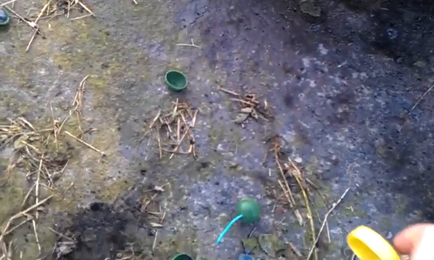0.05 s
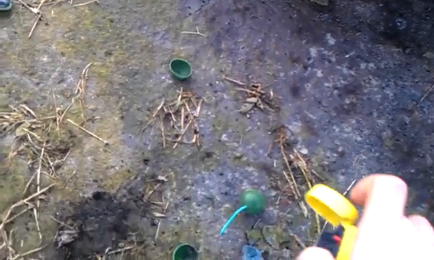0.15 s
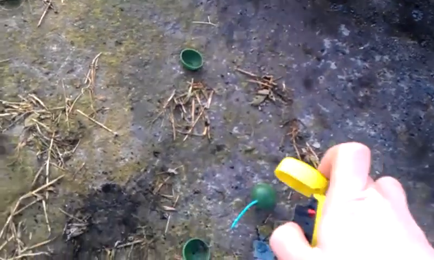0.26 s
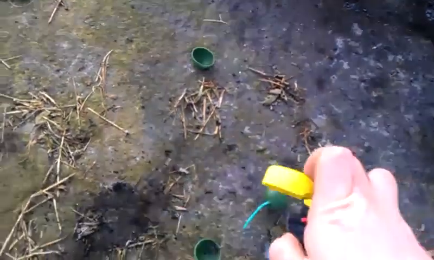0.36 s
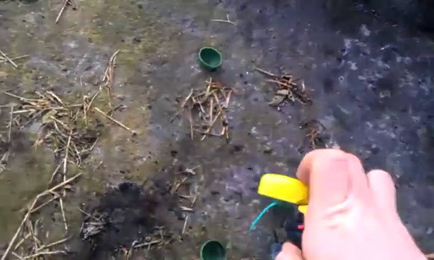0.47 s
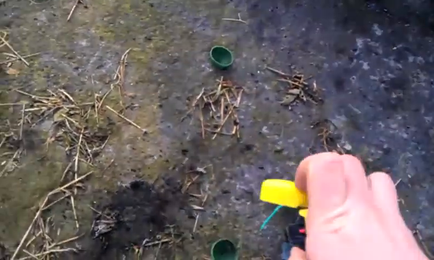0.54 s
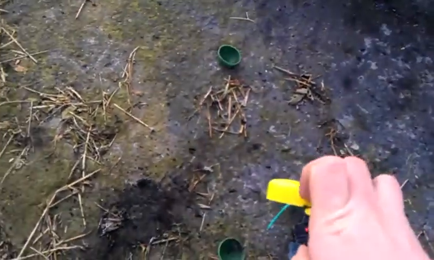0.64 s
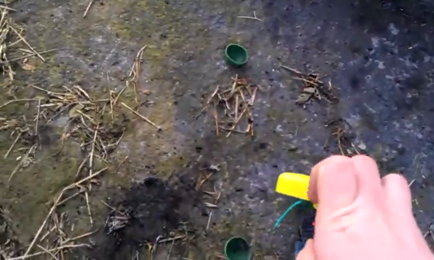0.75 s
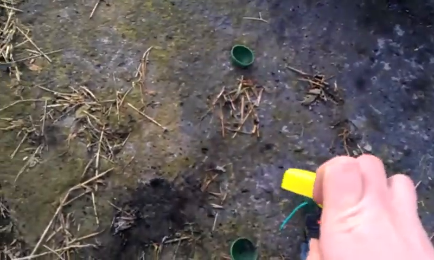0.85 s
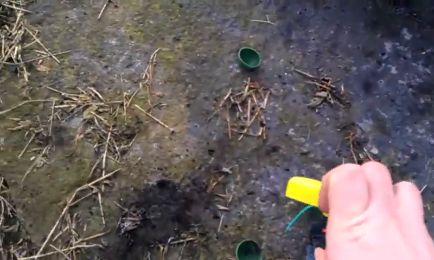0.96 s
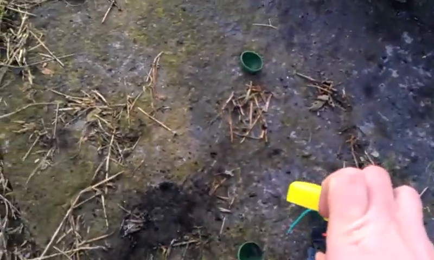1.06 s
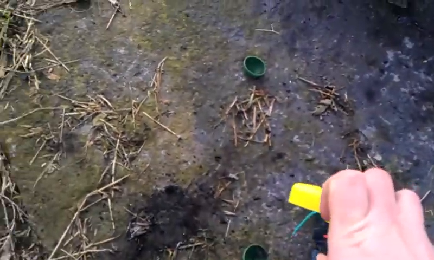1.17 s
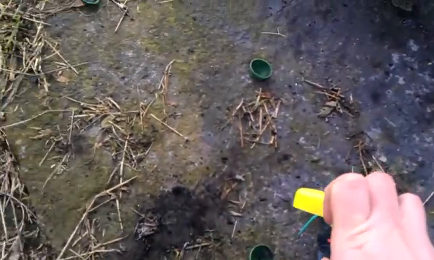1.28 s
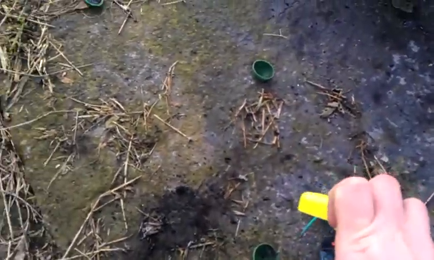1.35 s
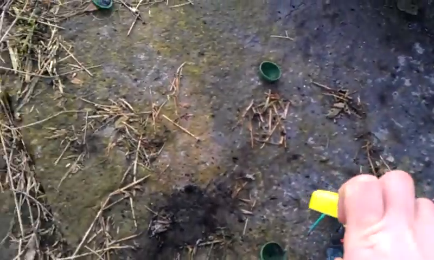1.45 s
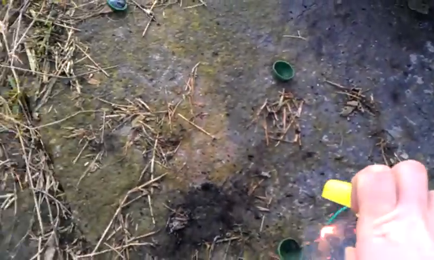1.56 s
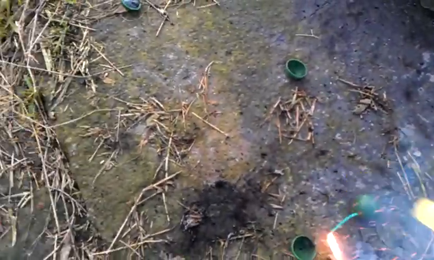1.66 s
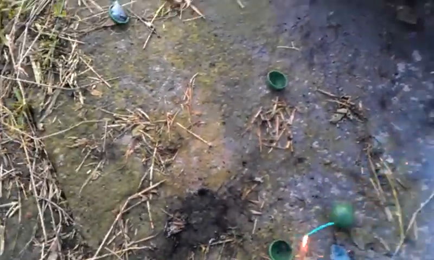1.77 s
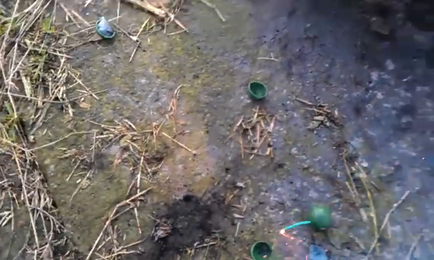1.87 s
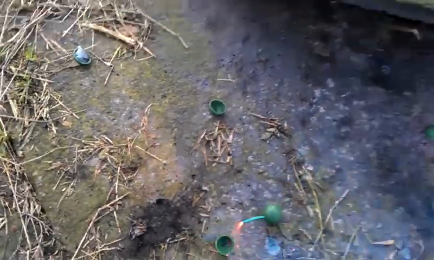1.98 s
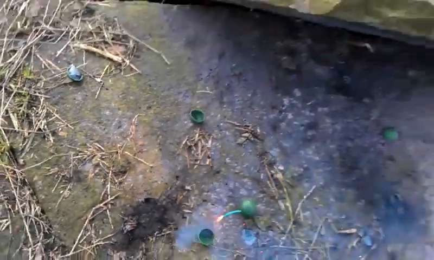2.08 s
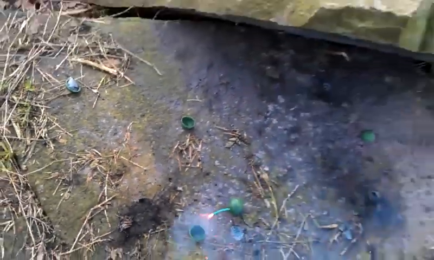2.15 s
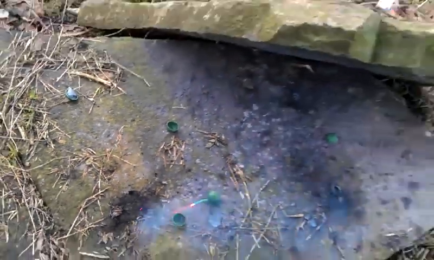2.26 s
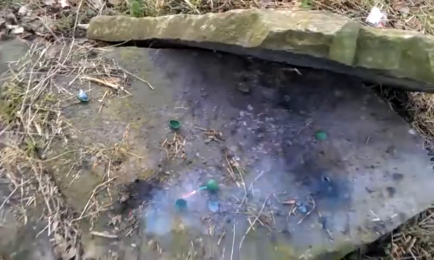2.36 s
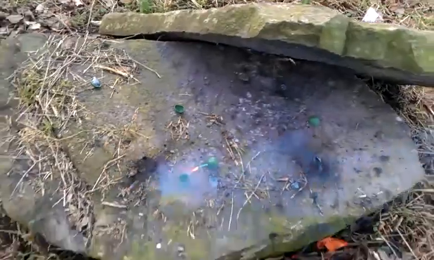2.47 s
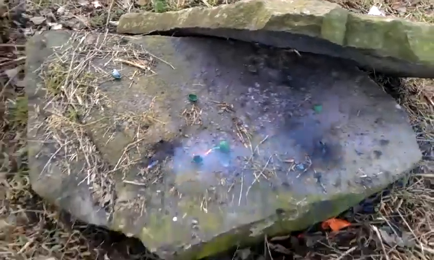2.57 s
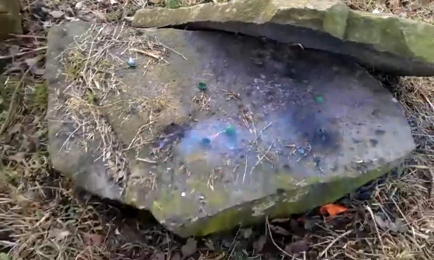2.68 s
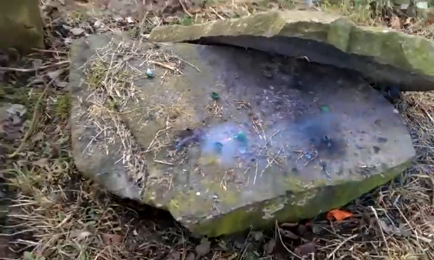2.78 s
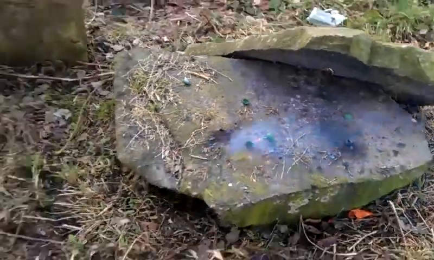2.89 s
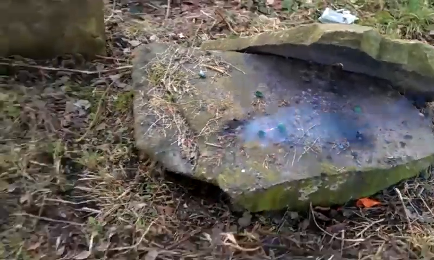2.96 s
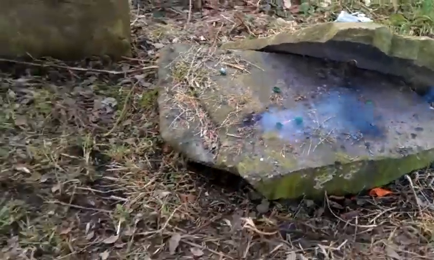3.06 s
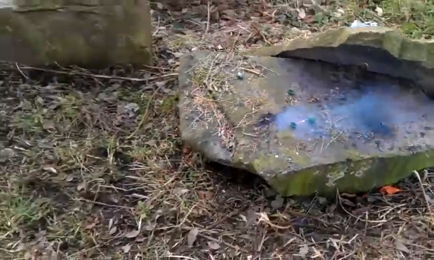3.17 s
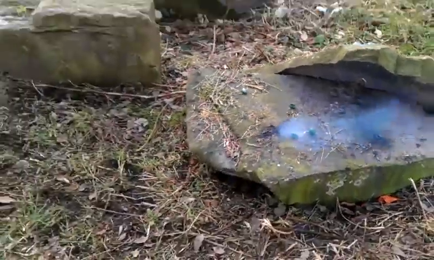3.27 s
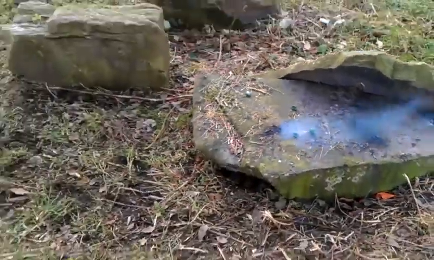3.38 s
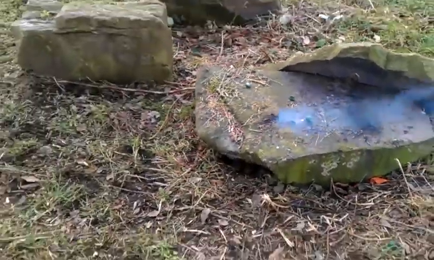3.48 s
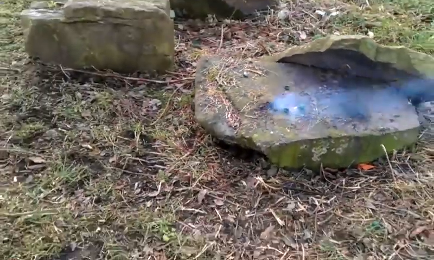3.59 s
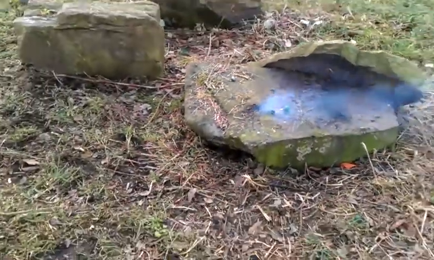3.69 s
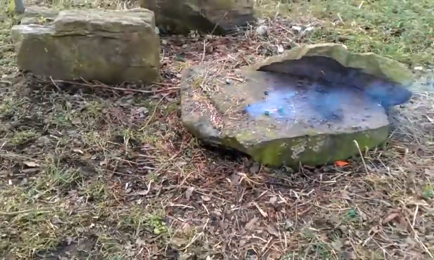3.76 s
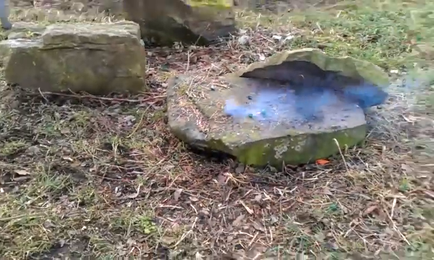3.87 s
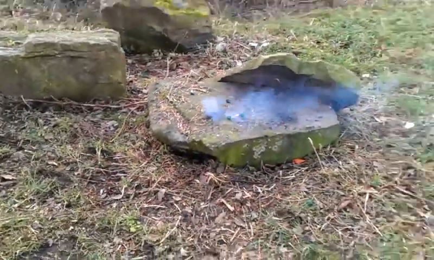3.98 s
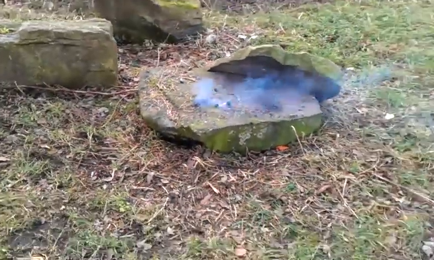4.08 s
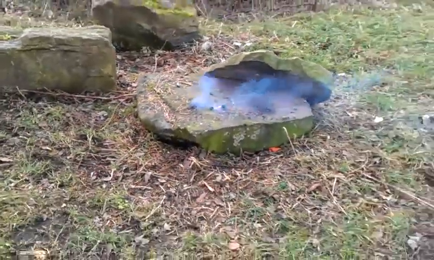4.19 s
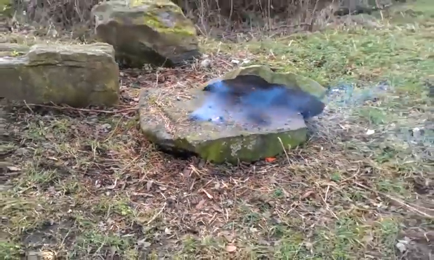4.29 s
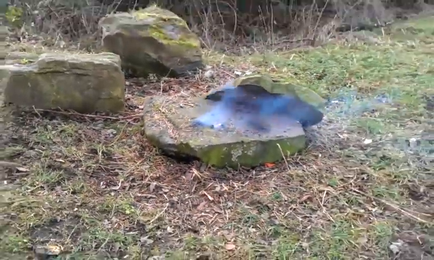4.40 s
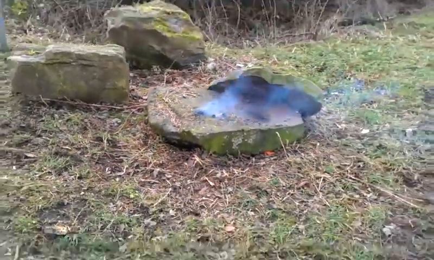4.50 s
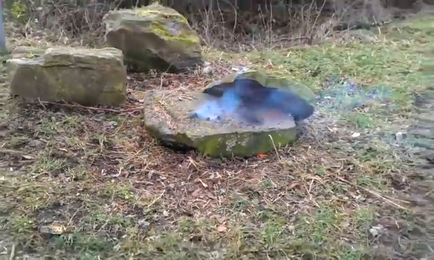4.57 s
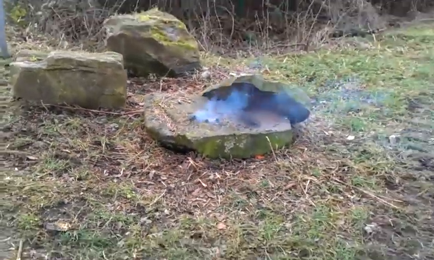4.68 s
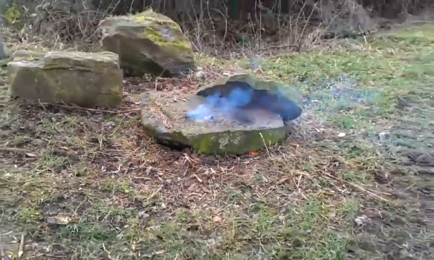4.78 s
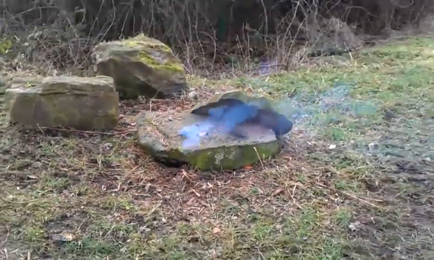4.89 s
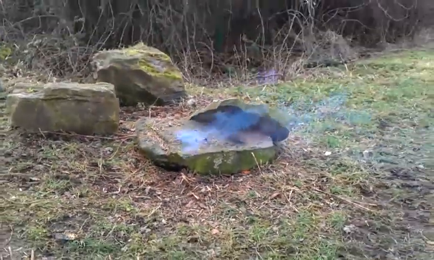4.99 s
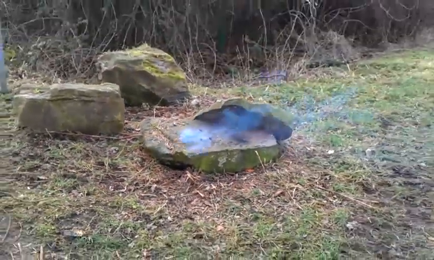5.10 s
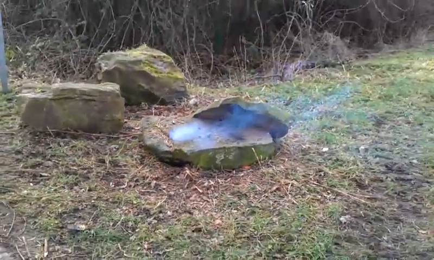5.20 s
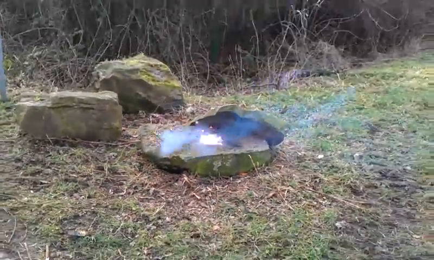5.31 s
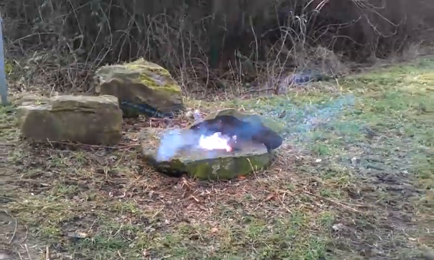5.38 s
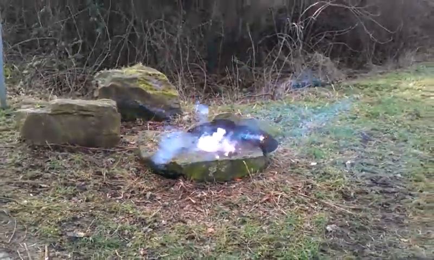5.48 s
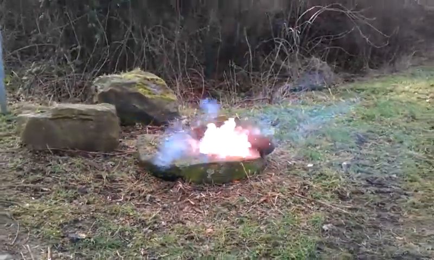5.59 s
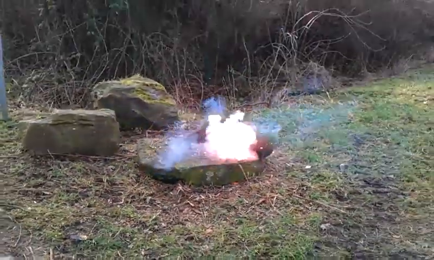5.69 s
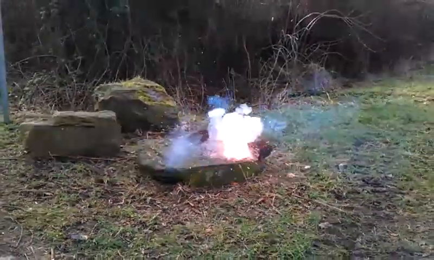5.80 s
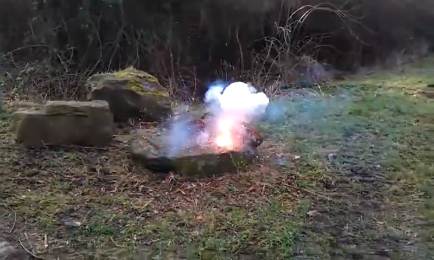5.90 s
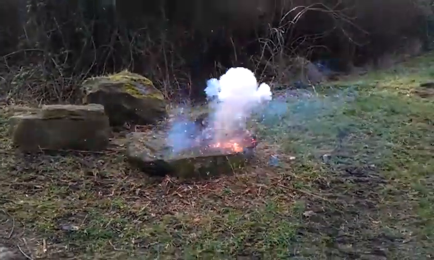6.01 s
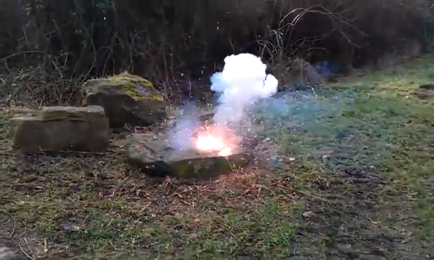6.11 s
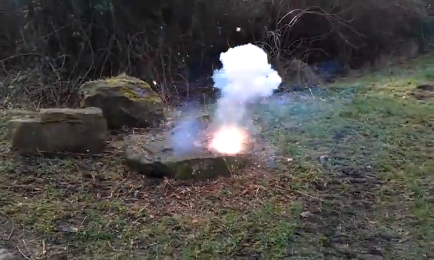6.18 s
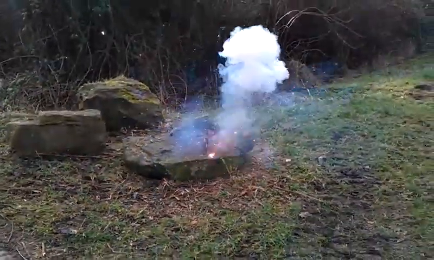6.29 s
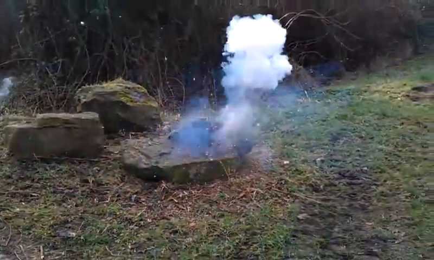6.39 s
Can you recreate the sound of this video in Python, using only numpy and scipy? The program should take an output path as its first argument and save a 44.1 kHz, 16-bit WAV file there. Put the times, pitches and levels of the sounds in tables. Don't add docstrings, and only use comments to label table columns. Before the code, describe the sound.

Outdoors in mono, a faint breeze rumbles over a quiet open-air hush. Cloth rustles lightly until about 0.4 seconds, with a soft tick and a small knock. At 0.67 gas hisses briefly, then a tight cluster of sharp plastic snaps comes at 0.76 and the flame burns with a soft, sagging hiss. Around 1.55 the fuse catches, swelling into a bright spitting jet by 1.8, with a hollow, phasey stone reflection. It recedes as the listener backs away; clicks and low bumps come near 2.5-2.9, then scattered dull footsteps. The hiss flares again at 4.9, ebbs, and puffs with a click at 5.3. Isolated hard pops strike from 5.5, thickening after 5.7 into very loud, dense, ragged crackling. The microphone overloads and its level clamps, with a brief lull near 6.28, and crackling still continues at the cut around 6.45.

```python
import sys
import numpy as np
from scipy import signal
from scipy.fft import rfft, irfft, next_fast_len
from scipy.io import wavfile
from scipy.ndimage import map_coordinates

SR = 44100
rng = np.random.default_rng(int(sys.argv[2]) if len(sys.argv) > 2 else 0)


def dump(signal):
    limited = np.clip(np.atleast_2d(signal).T, -1, 1)
    pcm = np.round(limited * 32767).astype(np.int16)
    wavfile.write(sys.argv[1], SR, pcm)


def voltage_ratio(level):
    return 10 ** (np.asarray(level, float) / 20)


N = 284445

# pitch_hz, density_db (per Hz)
WIND_COLOUR = [(12, -42), (20, -2), (54, -2), (93, -4), (201, -13.5), (233, -13), (400, -32.5), (520, -50),
               (880, -120)]
# peak_s, peak_db, slowness (1 = usual)
GUSTS = [(.1, -56, 3.1), (.7, -56, 1.5), (1, -55, 1.5), (1.24, -53, .9), (1.36, -53, 1.5), (2.28, -51, 1.6),
         (2.45, -53, .9), (2.675, -38, .45), (2.75, -45, .4), (2.86, -51, .9), (2.98, -47, 1.6),
         (3.2, -52, 1.5), (3.33, -42, .4), (3.41, -50, .9), (3.6, -54, .9), (4, -52, 2.2), (4.33, -49, .9),
         (4.6, -54, 1.2), (4.83, -49, 1.1), (5.04, -49, 1.2), (5.18, -48, 1.1), (5.36, -48, .9),
         (5.57, -51, .9)]
BREEZE_DB, GUST_RISE_S, GUST_FALL_S = -59, .05, .08
BLAST_WIND_S, BLAST_WIND_DB = 5.7, -49
# pitch_hz, density_db (per Hz)
FIELD_COLOUR = [(100, 1.5), (250, -3), (600, -5), (1200, -4), (1900, -11), (3000, -18), (7000, -16),
                (15500, -24)]
FIELD_DB = -54

# pitch_hz, density_db (per Hz)
GAS_COLOUR = [(1760, -57), (3000, -27), (4090, -10), (4790, -20), (5720, -8), (7530, 2), (15500, -20)]
RUSTLE_DB, RUSTLE_FADE_DB_PER_S, RUSTLE_END_S = -58, 30, .36
# peak_s, peak_db, rise_s (per 10 dB), fall_s (per 10 dB)
BRUSH = [
    (.11, -49, .016, .012),
]
VALVE_S, GAS_END_S, GAS_DB = .67, .745, -52
# peak_s, peak_db, rise_s (per 10 dB), fall_s (per 10 dB)
CATCH = [
    (.82, -50, .05, .035),
]
# pitch_hz, density_db (per Hz)
FLAME_COLOUR = [(290, -37), (500, -7), (839, 0), (1070, -10), (1510, -1), (1770, -19), (2040, -2),
                (2540, -16), (3680, -9), (4130, -29), (5050, -12), (6360, -12), (8120, -22.5), (15500, -21)]
FLAME_S, FLAME_END_S, FLAME_DB, FLAME_SAG_DB_PER_S = .785, 1.54, -49, 5
# delay_ms, share
FLAME_ECHOES = [(1.39, 0.067), (1.62, 0.12), (2.08, .15)]
# pitch_hz, level_db, t60_s
SHELL_MODES = [(2150, -4, 0.028), (2360, -8, 0.014), (4020, -10, .014), (5580, -3, 0.021), (6800, -3, 0.01),
               (8800, 2.5, .010), (11900, -17, .010), (14700, -18, .010)]
# start_s, peak_db, crack_db (relative to peak)
CLICKS = [(.108, -52, 6), (.7573, -9, -5), (.7585, -10, -5), (.7598, -12, -5), (.7615, -19, 0),
          (.7695, -31, 3), (.815, -46, 9), (.822, -47, 9), (.83, -48, 9), (1.255, -52, 6), (1.7805, -22, 8),
          (5.308, -28, 8), (2.6534, -19, 13), (2.6559, -20, 11), (2.6599, -22, 11)]
# start_s, peak_db, pitch_hz
STEPS = [(0.361, -36, 2120), (.7575, -37, 400), (.7575, -34, 890), (2.529, -34, 385), (2.54, -35, 800),
         (2.666, -31, 146), (2.683, -31, 107), (2.729, -36, 76), (2.836, -37, 590), (3.826, -33.5, 480),
         (4.34, -35, 222), (4.345, -36, 550), (4.61, -39, 101), (4.761, -34, 90), (4.81, -43, 110),
         (5.174, -40, 80)]

# time_s, jet_db
FUSE = [(1.535, -62), (1.547, -45), (1.581, -38), (1.8, -21), (1.87, -26), (2.22, -31.5), (2.85, -36),
        (3.22, -34), (3.6, -41), (4.55, -42), (4.76, -41), (4.8, -34), (4.88, -29), (5.07, -31.5),
        (5.14, -36), (5.35, -42), (5.4, -38), (5.9, -38)]
MEAN_JET_DB = -35
# pitch_hz, density_db (per Hz)
JET_COLOUR = [(1470, -33), (2500, -20), (3110, -14.5), (3650, -9), (5670, -1), (7080, 2.5), (7820, 2),
              (11000, -13.5), (14300, -43), (22000, -120)]
# pitch_hz, density_db (per Hz)
AIR_COLOUR = [(9000, -2), (11000, -2), (15500, -3), (17000, -1)]
# pitch_hz, density_db (per Hz)
ROAR_COLOUR = [(700, -6), (1100, -5), (2000, -2), (3000, 0), (4500, -9.5)]
# pitch_hz, density_db (per Hz)
WHOOSH_COLOUR = [(120, -20), (300, 3), (450, -3.5), (800, 5.5), (1300, -13)]
# peak_s, peak_db, rise_s (per 10 dB), fall_s (per 10 dB), roar_db (relative to peak)
PUFFS = [(2.39, -30, .1, .05, -11), (2.53, -36, .05, .07, -10), (2.7, -33, .06, .07, -11),
         (3.5, -42, .1, .05, -4), (3.8, -40.5, .15, .09, -8), (4.05, -38, .1, .04, -10),
         (4.15, -41, .05, .03, -12), (4.35, -43, .1, .07, -5), (5.3, -22.5, .028, .04, -19),
         (5.333, -22.5, .055, .008, -22), (5.338, -34, .002, .006, 17), (5.37, -45, .03, .06, 8),
         (5.54, -27.5, .05, .032, -10), (5.63, -30.5, .04, .06, -12), (5.76, -15, .045, .17, -14)]
GUSH_WHOOSH_DB, GUSH_ROAR_DB, GUSH_AIR_DB = -7.5, -6, -18
IGNITION_END_S, IGNITION_FADE_S, ROAR_BUILD_S, ROAR_LINGER_S = 1.78, .03, .15, .08
WHOOSH_DB, WHOOSH_FOLLOWS, WHOOSH_LOSS_DB_PER_S = -52, .55, 1.5
ROAR_DB, ROAR_FOLLOWS, ROAR_LOSS_DB_PER_S = -43, .58, 1.8
AIR_DB, AIR_LOSS_DB_PER_S, BURST_S, BURST_AIR_DB, BURST_ROAR_DB = -3, 4.5, 5.345, 9.5, 3.5
# time_s, delay_ms, share
SLAB_ECHO = [(1.5, 1.64, .3), (1.7, 1.65, .35), (1.95, 1.54, .55), (2.2, 1.52, .58), (2.57, 1.61, .5),
             (2.7, 1.65, .22), (2.95, 1.69, .28), (3.1, 1.84, .27), (3.6, 1.91, .42), (4.45, 1.95, .25),
             (4.55, 1.68, .3), (4.85, 1.61, .58), (5.2, 1.72, .58), (5.4, 1.69, .3)]
# time_s, delay_ms, share
NEAR_ECHO = [(1.5, .58, .25), (2.4, .76, .2), (2.9, .69, .3), (3.2, .7, .42), (3.75, .85, .25),
             (4.1, .78, .05), (5.4, .7, .14)]

# start_s, strength_db (over the overload point), low_part_db
POPS = [(5.3355, -10, 27), (5.4943, 12, 6), (5.5942, 10, 3), (5.6085, -10, 0), (5.611, -14, 0),
        (5.683, -3, 4), (5.691, 4, 0), (5.7075, -3, 0), (5.7269, 10, 0), (5.7328, 8, 0), (5.8022, 10, 0),
        (5.8105, 8, 0), (5.8255, 10, 0), (5.8825, 8, 4), (5.9074, 8, 0), (6.0781, 10, 0), (6.2015, 10, 2),
        (6.2675, 10, 2), (6.2838, 14, 2), (6.2985, 10, 0), (6.318, 12, 0), (6.393, 10, 0)]
# time_s, rate_per_s, strength_db (typical)
CRACKLE = [
    (5.69, 90, -21),
    (5.73, 200, -20),
    (5.77, 850, -12),
    (6.24, 980, -11),
    (6.28, 750, -14.5),
    (6.32, 900, -12),
    (6.45, 950, -11),
]
# start_s, size_db, direction
KICKS = [(5.7833, -24.5, -1), (5.839, -18.5, -1), (5.8868, -20.5, 1), (5.9305, -27, -1), (6.0082, -25, -1),
         (6.0385, -25, -1), (6.0918, -25.5, 1), (6.1486, -24.5, -1), (6.1685, -24, -1), (6.1798, -24.5, 1),
         (6.286, -25, -1), (6.3069, -21.5, -1), (6.3702, -20, 1)]
OVERLOAD = .44
CLAMP_DB, CLAMP_SLOPE = -21.5, 0.66


def clock():
    return np.arange(N) / SR


def unit(x):
    return x / np.sqrt(np.mean(x ** 2) + 1e-20)


def in_time(rows, off=None):
    s, *columns = np.transpose(rows)
    return [np.interp(clock(), s, column, off, off) for column in columns]


def after(s, fade_s):
    return .5 + .5 * np.tanh((clock() - s) / fade_s)


def swells(s, peak_db, rise_s, fall_s):
    coarse = clock()[::32]
    t = coarse[:, None] - s
    gain = voltage_ratio(peak_db + 10 * np.minimum(t / rise_s, -t / fall_s))
    return np.interp(clock(), coarse, np.sqrt(np.sum(gain ** 2, axis=1)))


def one_pole(x, seconds):
    r = np.exp(-1 / (seconds * SR))
    return signal.lfilter([1 - r], [1, -r], x + 1e-18)


def filtered(x, order, hz, kind):
    return signal.sosfilt(signal.butter(order, hz, kind, fs=SR, output="sos"), x)


def drift(rate_hz, db):
    smooth = signal.butter(2, rate_hz, fs=SR / 40, output="sos")
    slow = signal.sosfilt(smooth, rng.standard_normal(N // 40 + 2002))[2000:]
    return db * unit(slow)


def full_rate(slow):
    return np.interp(np.arange(N) / 40, np.arange(len(slow)), slow)


def hiss(colour, patchy_db, grainy_db, rate_hz=15):
    size = next_fast_len(N)
    hz = np.arange(size // 2 + 1) * SR / size + 1
    pitch_hz, density_db = np.transpose(colour)
    grain = unit(one_pole(rng.standard_normal(N), 0.00073))
    white = rng.standard_normal(N) * voltage_ratio(grainy_db * grain)
    lines = rfft(white, size) * voltage_ratio(np.interp(np.log(hz), np.log(pitch_hz), density_db, -70))
    together = drift(rate_hz, 0.95 * patchy_db)
    out = 0
    for octave in range(5, 15, 2):
        window = np.cos(np.clip((np.log2(hz) - octave) / 2, -1, 1) * np.pi / 2) ** 2
        flicker = full_rate(voltage_ratio(together + drift(rate_hz, patchy_db)))
        out = out + irfft(lines * window, size)[:N] * flicker
    return unit(out)


def strikes(rows, db):
    x = np.zeros(N)
    x[[round(row[0] * SR) for row in rows]] = voltage_ratio(db)
    return x


def ring(x, hz, t60):
    r, w = voltage_ratio(-60 / (t60 * SR)), 2 * np.pi * hz / SR
    return signal.lfilter([0, np.sin(w)], [1, -2 * r * np.cos(w), r * r], x + 1e-18)


def ring_down(clicks, seconds, tail_db, tail_s):
    fall = one_pole(clicks, seconds) * seconds * SR
    tail = one_pole(clicks, tail_s) * tail_s * SR
    return fall + voltage_ratio(tail_db) * tail


def capsule(x, low_db):
    peak = ring(x, hz=7230, t60=0.00135) * 0.41
    return peak + voltage_ratio(low_db) * filtered(x, 2, [500, 14000], "band")


def wind():
    s, peak_db, slow = np.transpose(GUSTS)
    level = np.hypot(voltage_ratio(BREEZE_DB), swells(s, peak_db, slow * GUST_RISE_S, slow * GUST_FALL_S))
    level = level + voltage_ratio(BLAST_WIND_DB) * after(BLAST_WIND_S, .01)
    return level * hiss(WIND_COLOUR, patchy_db=2.2, grainy_db=0, rate_hz=8.6)


def field():
    return voltage_ratio(FIELD_DB) * hiss(FIELD_COLOUR, patchy_db=.5, grainy_db=0)


def rustle_and_gas():
    t = clock()
    rustle = voltage_ratio(RUSTLE_DB - RUSTLE_FADE_DB_PER_S * t) * (1 - after(RUSTLE_END_S, .02))
    rustle = np.hypot(rustle, swells(*np.transpose(BRUSH)))
    valve = voltage_ratio(GAS_DB) * after(VALVE_S, .003) * (t < GAS_END_S)
    catch = swells(*np.transpose(CATCH))
    return (rustle + valve + catch) * hiss(GAS_COLOUR, patchy_db=.7, grainy_db=.8)


def lighter_clicks():
    s, peak_db, crack_db = np.transpose(CLICKS)
    spread_db = rng.normal(0, 1.5, (len(s), len(SHELL_MODES)))
    body = 0
    for k, (hz, db, t60) in enumerate(SHELL_MODES):
        body = body + ring(strikes(CLICKS, peak_db + db - 5 + spread_db[:, k]), hz, 0.78 * t60)
    burst = ring_down(strikes(CLICKS, peak_db + crack_db - 3), .0015, tail_db=-22, tail_s=.009)
    snap = strikes(CLICKS, peak_db + crack_db - 16.5)
    crack = capsule(burst * rng.standard_normal(N) + snap, low_db=-3.5)
    return filtered(body + crack, 4, 1800, "high")


def flame():
    t = clock()
    direct = hiss(FLAME_COLOUR, patchy_db=0.4, grainy_db=.6)
    echoes = sum(share * np.roll(direct, round(ms * SR / 1000)) for ms, share in FLAME_ECHOES)
    burning = (t > FLAME_S) * (t < FLAME_END_S)
    level = one_pole(voltage_ratio(FLAME_DB - FLAME_SAG_DB_PER_S * (t - FLAME_S)) * burning, 0.006)
    return unit(direct + echoes) * level


def lighter():
    return rustle_and_gas() + lighter_clicks() + flame()


def steps():
    return sum(ring(strikes([row], row[1]), row[2], 0.0093 + 6.0 / row[2]) for row in STEPS)


def slab_echo(x):
    slab_ms, slab = in_time(SLAB_ECHO)
    near_ms, near = in_time(NEAR_ECHO)
    dull = 1.25 * one_pole(x, .00003)

    def late(ms):
        return map_coordinates(dull, [np.arange(N) - (ms - .02) * SR / 1000], order=3)

    return (x + slab * late(slab_ms) + near * late(near_ms)) / np.sqrt(1 + slab ** 2 + near ** 2)


def fuse():
    jet_db, = in_time(FUSE, off=-99)
    s, peak_db, rise_s, fall_s, puff_roar_db = np.transpose(PUFFS)
    burnt_s = clock() - FUSE[0][0]
    gush = 1 - after(IGNITION_END_S, IGNITION_FADE_S)
    lit = (burnt_s > 0) * (1 - gush)
    swing_db = jet_db - MEAN_JET_DB
    shell_open = after(BURST_S, .01)

    air_db = AIR_DB - AIR_LOSS_DB_PER_S * burnt_s + GUSH_AIR_DB * gush + BURST_AIR_DB * shell_open
    jet = hiss(JET_COLOUR, patchy_db=0.7, grainy_db=1.0)
    jet = jet + voltage_ratio(air_db) * hiss(AIR_COLOUR, patchy_db=-2.0, grainy_db=2.5)
    jet = jet * np.hypot(voltage_ratio(jet_db), swells(s, peak_db, rise_s, fall_s))

    roar_db = ROAR_DB + ROAR_FOLLOWS * swing_db - ROAR_LOSS_DB_PER_S * burnt_s
    roar_db = roar_db + BURST_ROAR_DB * shell_open
    surge_end = after(IGNITION_END_S + ROAR_LINGER_S, IGNITION_FADE_S)
    surge = np.clip(burnt_s / ROAR_BUILD_S, 0, 1) * (1 - surge_end)
    roar_level = lit * (1 - surge) * voltage_ratio(roar_db) + surge * voltage_ratio(jet_db + GUSH_ROAR_DB)
    roar_level = np.hypot(roar_level, swells(s, peak_db + puff_roar_db, rise_s, fall_s))
    roar = roar_level * hiss(ROAR_COLOUR, patchy_db=1.7, grainy_db=1.0)

    whoosh_db = WHOOSH_DB + WHOOSH_FOLLOWS * swing_db - WHOOSH_LOSS_DB_PER_S * burnt_s
    whoosh_level = lit * voltage_ratio(whoosh_db) + gush * voltage_ratio(jet_db + GUSH_WHOOSH_DB)
    whoosh_level = np.hypot(whoosh_level, swells(s, peak_db + puff_roar_db - 12, rise_s, fall_s))
    whoosh = whoosh_level * hiss(WHOOSH_COLOUR, patchy_db=-0.3, grainy_db=1.3)
    return slab_echo(jet + roar) + whoosh


def pops():
    noise = rng.standard_normal(N)
    s, pop_db, low_db = np.transpose(POPS)
    big = ring_down(strikes(POPS, pop_db), .0026, tail_db=-26, tail_s=.012) * noise
    shock = strikes(POPS, pop_db + 8)
    body = ring_down(strikes(POPS, pop_db + low_db - 20), 0.0021, tail_db=-42, tail_s=0.015) * noise
    body = filtered(body, 2, [250, 5000], "band")

    per_s, size_db = in_time(CRACKLE)
    clumps = full_rate(voltage_ratio(drift(30, 2.5)))
    born = (rng.random(N) < per_s * clumps / SR) * (np.arange(N) > CRACKLE[0][0] * SR)
    small = born * voltage_ratio(size_db + 3.9 * np.minimum(rng.exponential(1, N), 4))
    crackle = ring_down(small, .0008, tail_db=-17, tail_s=.01) * noise + voltage_ratio(10) * small
    return OVERLOAD * (capsule(big + shock + crackle, low_db=-23) + body)


def kicks():
    s, size_db, direction = np.transpose(KICKS)
    x = strikes(KICKS, 1.7 * size_db + 33)
    x[x > 0] *= np.sign(direction)
    leak_s = .0026
    return one_pole(x, leak_s) * leak_s * SR


def scene():
    mix = wind() + field() + lighter() + steps() + fuse() + pops() + kicks()
    return np.tile(mix, (2, 1))


def low_pass(x):
    return signal.sosfilt(signal.butter(12, 16700, fs=SR, output="sos"), x)


def record(dry):
    x = np.clip(dry, -OVERLOAD, OVERLOAD)
    level_db = 10 * np.log10(one_pole(x ** 2, .0045) + 1e-12)
    x = x * voltage_ratio(-CLAMP_SLOPE * np.maximum(level_db - CLAMP_DB, 0))
    x = filtered(x, 1, 14, "high")
    x = signal.sosfilt(signal.ellip(8, .5, 60, 15900, fs=SR, output="sos"), x)
    return low_pass(x)


dry = scene()
out = record(dry)
dump(out)
```